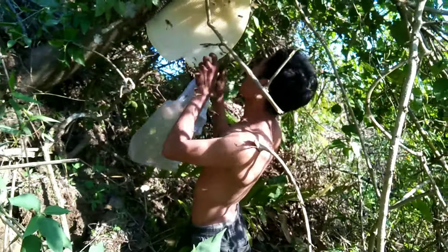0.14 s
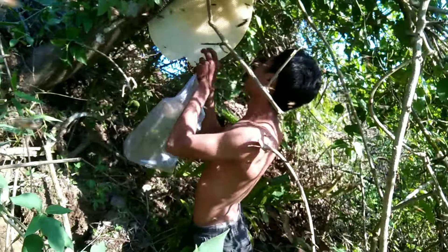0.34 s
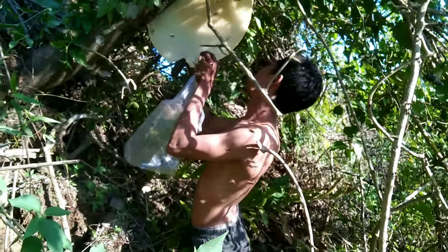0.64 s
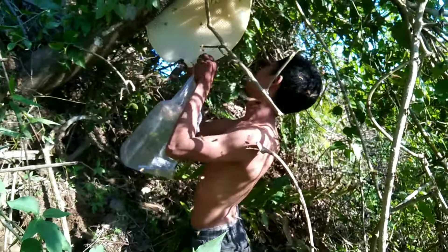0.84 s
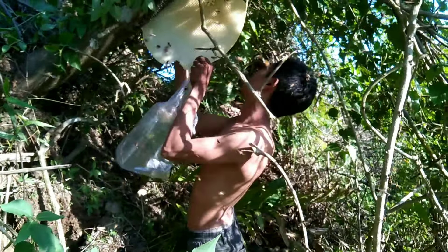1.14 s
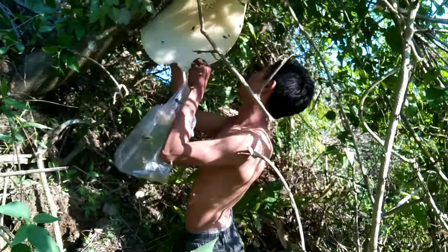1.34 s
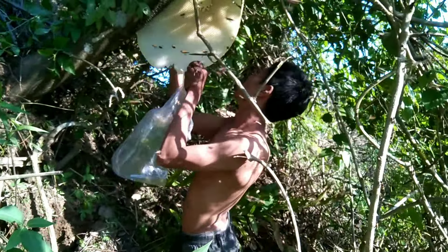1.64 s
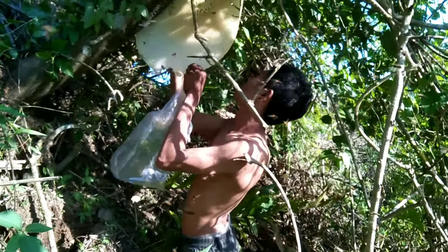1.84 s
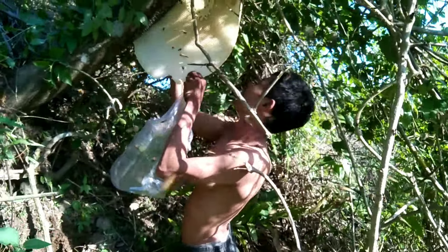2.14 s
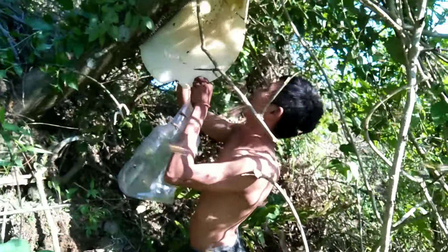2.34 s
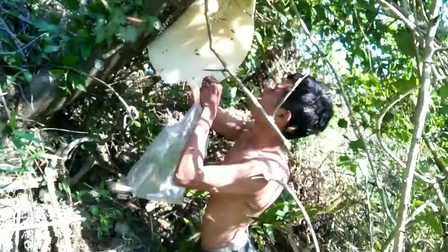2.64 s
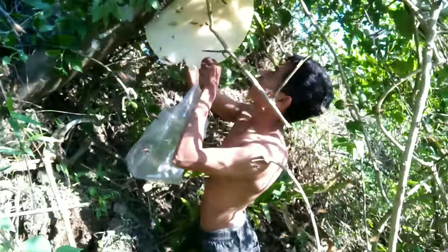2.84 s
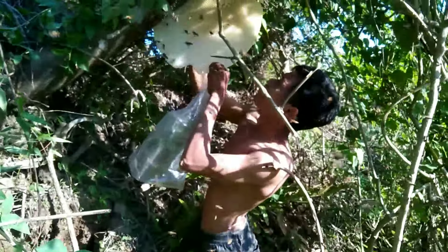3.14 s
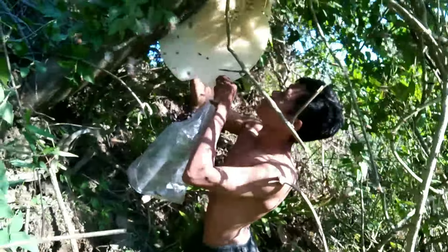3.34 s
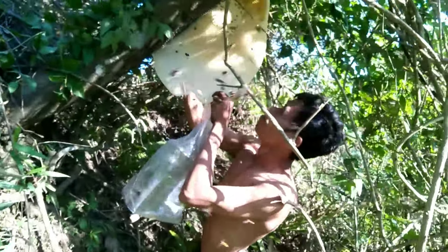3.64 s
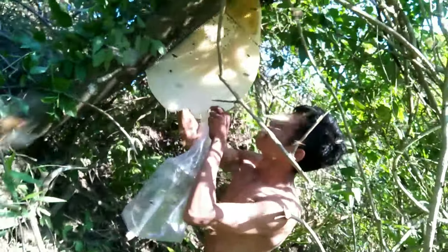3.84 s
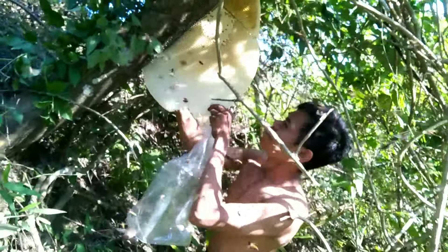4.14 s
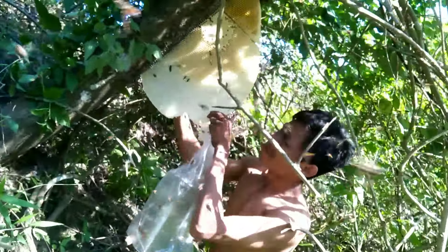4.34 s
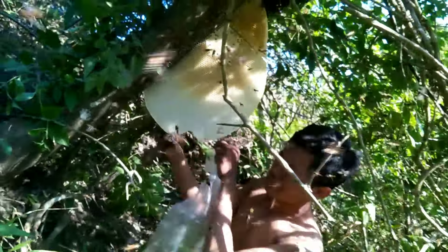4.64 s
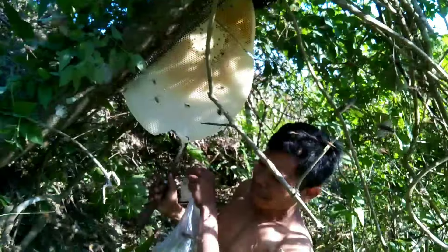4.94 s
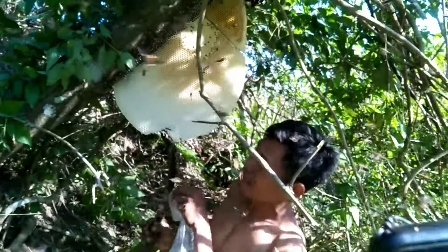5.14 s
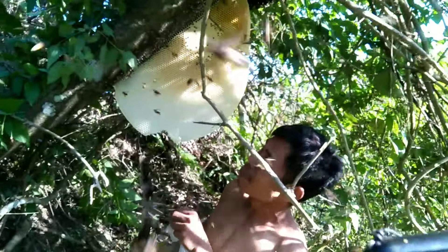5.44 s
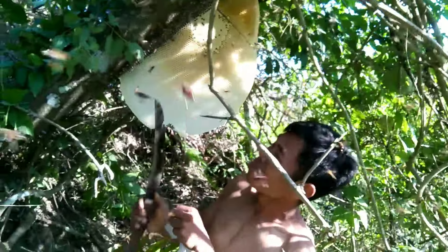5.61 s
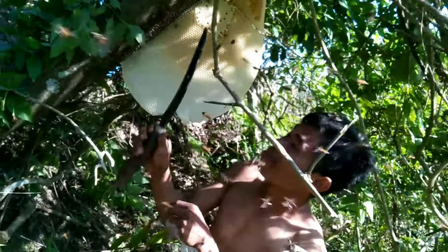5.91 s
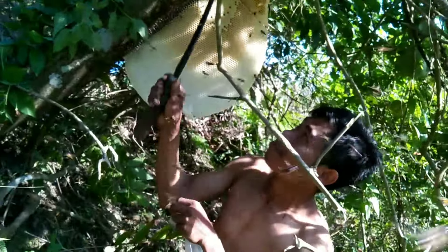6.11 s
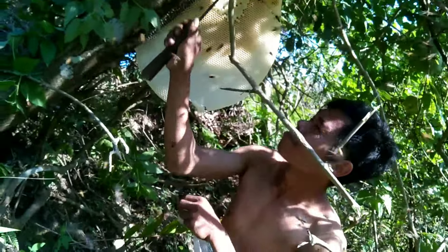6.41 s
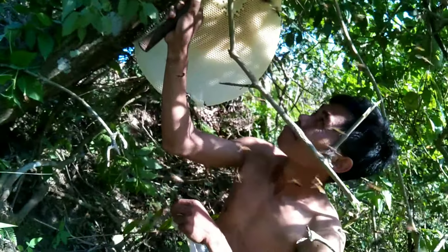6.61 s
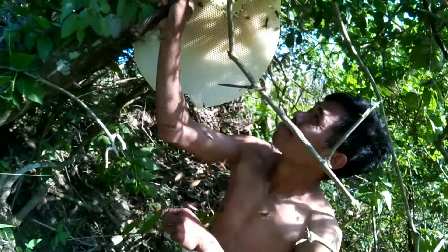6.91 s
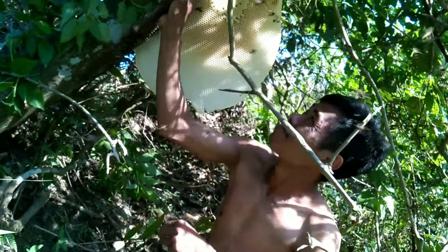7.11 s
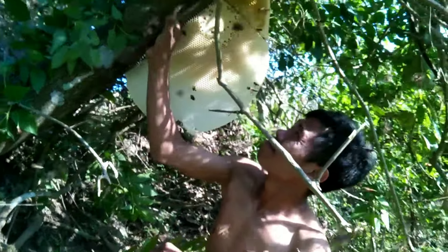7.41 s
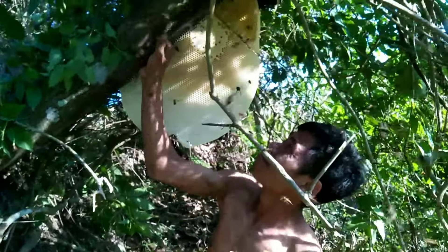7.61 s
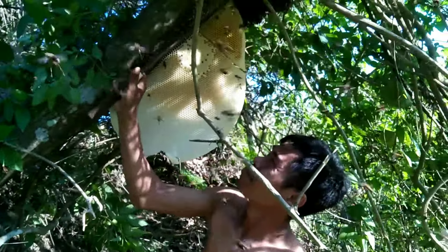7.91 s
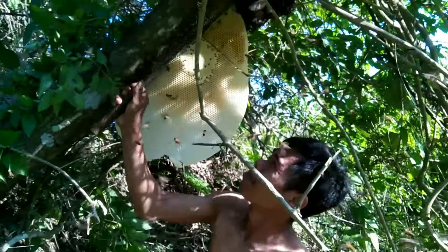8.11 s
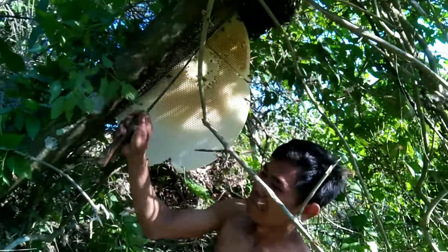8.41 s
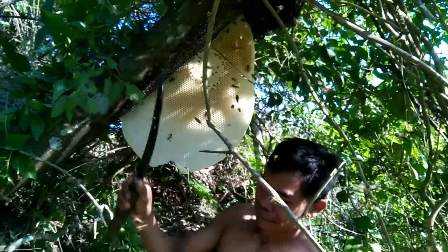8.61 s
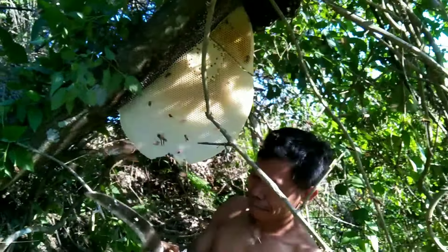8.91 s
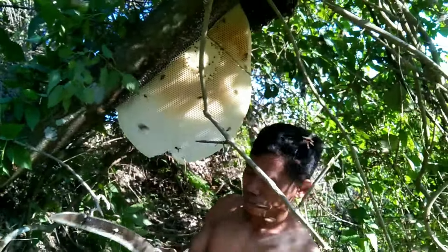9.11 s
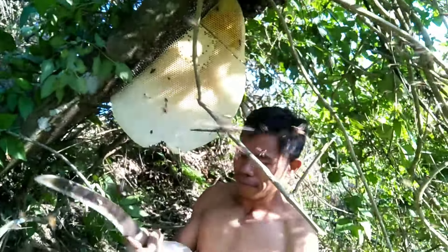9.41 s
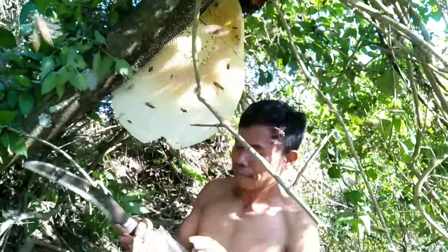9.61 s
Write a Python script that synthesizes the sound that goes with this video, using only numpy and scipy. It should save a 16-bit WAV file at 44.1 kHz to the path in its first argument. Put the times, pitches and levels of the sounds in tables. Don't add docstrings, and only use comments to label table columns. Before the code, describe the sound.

A bee swarm hums in a leafy thicket, a plastic bag crackles sharply close by, and near the end one bee buzzes hard past the microphone.

```python
import sys
import numpy as np
from scipy import signal
from scipy.fft import rfft, irfft
from scipy.io import wavfile
from scipy.ndimage import uniform_filter1d

SR = 44100
rng = np.random.default_rng(int(sys.argv[2]) if len(sys.argv) > 2 else 0)


def materialize(psi):
    bounded = np.clip(np.atleast_2d(psi).T, -1, 1)
    quanta = np.round(bounded * 32767).astype(np.int16)
    wavfile.write(sys.argv[1], SR, quanta)


def boost_factor(decibels):
    exponent = np.asarray(decibels, float) / 20
    return 10 ** exponent


N = 430416

# (wing beat [Hz], spread [share], bees [count], level [dB])
FLIGHTS = [
    (120.8, .10, 6, -1.5),
    (149.3, .08, 6, -0.5),
    (202.55, .045, 14, -5),
    (280.8, .06, 7, -7),
]
# (frequency [Hz], gain [dB])
WING_COLOUR = [(60, -11), (110, -7.5), (200, 4), (290, 2.5), (335, -2), (385, 0.5), (440, -3.5),
               (490, -12.5), (560, -11.5), (900, -15.5), (1100, -20), (1400, -19), (1900, -41), (2600, -49)]
# (time [s], level [dB])
THICKNESS = [(0, -60), (.45, -55.5), (.85, -57.5), (1.3, -51.5), (1.9, -55), (2.5, -50), (3.0, -50),
             (3.5, -46.5), (4.4, -44.5), (5.2, -45.5), (5.8, -44), (6.3, -43.5), (7.0, -45.5), (7.6, -47.5),
             (8.5, -47), (9.0, -48.5), (9.4, -46), (9.76, -47.5)]
# (level at mean thickness [dB], share of swing [1], wander [dB])
WING_RANGES = [
    (-53.5, 1.1, -1),
    (-44, 0.26, -1.5),
    (-47, 1.21, 1.5),
    (-53, 1.53, 1),
]
# (time [s], length [s], level [dB])
HEAVY_FLYBYS = [(0.016, 0.036, -39), (0.152, 0.044, -48), (0.296, 0.048, -54), (1.08, 0.12, -44),
                (1.8, 0.047, -45), (2.065, 0.15, -42), (2.553, .12, -48), (2.894, 0.045, -47),
                (3.11, 0.11, -45.5), (3.535, 0.14, -43), (4.082, 0.12, -45.5), (4.41, 0.08, -44),
                (4.781, 0.26, -42.5), (5.68, 0.1, -39.5), (6.157, 0.29, -40.5), (6.757, 0.077, -47),
                (7.4, 0.095, -47), (7.704, 0.089, -44.5), (7.86, .04, -52), (8.07, 0.064, -41),
                (8.332, 0.11, -48), (8.86, 0.18, -49), (9.43, .06, -49), (9.68, 0.025, -66)]
# (time [s], length [s], level [dB])
WORKER_FLYBYS = [(0, 0.035, -38.5), (0.124, 0.096, -41), (0.28, 0.079, -42), (0.568, 0.034, -44),
                 (1.06, 0.063, -40), (1.28, 0.12, -39), (1.426, 0.031, -39), (1.636, 0.087, -40),
                 (1.938, 0.32, -43), (2.46, 0.096, -39), (2.813, 0.045, -41), (3.063, 0.11, -44),
                 (3.327, 0.12, -37.5), (3.754, 0.2, -40), (4.086, 0.11, -45), (4.457, 0.68, -41),
                 (5.645, 0.43, -38.5), (6.022, 0.42, -38.5), (6.715, 0.26, -42), (7.08, 0.15, -38.5),
                 (7.467, 0.066, -37), (7.676, 0.044, -37.5), (7.876, 0.071, -40.5), (8.14, 0.05, -33),
                 (8.435, 0.054, -36.5), (8.894, 0.4, -39.5), (9.228, 0.037, -35.5), (9.54, 0.13, -61)]
# (time [s], length [s], level [dB])
BANKING_FLYBYS = [
    [(.15, 0.11, -47), (.4, 0.031, -47), (.56, .08, -51), (.72, .06, -52), (.97, 0.042, -47.5),
     (1.2, 0.32, -48.5), (1.4, 0.091, -46), (2.07, 0.055, -51), (2.3, 0.077, -43.5), (2.68, 0.028, -41.5),
     (2.95, 0.1, -50), (5.7, .3, -45), (7.73, 0.052, -41), (7.9, 0.16, -43)],
    [(.02, 0.072, -50.5), (.27, 0.1, -52), (.5, .07, -59.5), (.68, 0.091, -62), (.95, 0.047, -59.5),
     (1.15, 0.039, -50.5), (1.46, 0.041, -55), (1.77, 0.064, -54), (2.35, 0.2, -51.5), (2.85, 0.11, -53.5),
     (6.1, 0.064, -57), (7.3, 0.094, -53), (8.35, 0.12, -53), (8.96, .08, -47.5)],
]
# (time [s], length [s], level [dB])
AIR_PUSHES = [(1.05, .08, -60), (2.07, .08, -64), (3.68, .08, -57), (4.5, .08, -55), (4.97, .08, -55),
              (5.25, .06, -58), (5.62, .15, -58), (6.15, 0.17, -61), (8.1, .05, -59)]
# (time [s], level [dB])
BREEZE = [(0, -59), (.65, -63.5), (1.0, -60.5), (2.0, -61.5), (2.58, -60), (3.3, -61), (3.6, -56),
          (4.05, -51), (4.9, -51), (5.46, -50), (6.03, -47.5), (6.5, -53), (6.85, -51.5), (7.03, -57),
          (7.4, -53.5), (8.1, -55.5), (8.8, -56.5), (9.76, -50)]
# (start [s], hold [s], level [dB], low part against it [dB])
BAG_RUBS = [(3.65, 0.16, -50, -4), (3.716, 0.23, -41.5, -15), (4.157, 0.19, -38.5, -15),
            (4.39, 0.051, -32, -10.5), (4.468, 0.14, -40, -12), (4.64, 0.071, -41, -10),
            (4.76, 0.05, -51.5, -8), (7.867, 0.047, -45, -9.5), (8.957, 0.065, -47.5, -8),
            (9.037, 0.17, -41.5, -14), (9.08, 0.082, -34.5, -6.5), (9.239, 0.13, -35, -8),
            (9.413, 0.2, -36, -6), (9.625, 0.15, -47, -8)]
# (frequency [Hz], gain [dB])
CRACKLE_COLOUR = [(1500, -0.5), (2000, -3), (3800, -1.5), (5000, 0), (7500, 7.5), (10000, 1), (11000, 0.5),
                  (15500, -5.5)]
# (centre [Hz], width [Hz], level against the breeze [dB])
INSECTS = [
    (2430, 1140, -11.5),
    (5230, 650, -10),
]
# (time [s], length [s], centre
# [Hz], width [Hz], level [dB])
BRUSHES = [(.275, .04, 5200, 900, -48), (.31, .05, 11200, 1500, -53), (.93, .06, 11000, 2500, -55),
           (1.52, .05, 10700, 900, -60), (1.985, .03, 5500, 600, -47), (1.985, .03, 7900, 300, -51),
           (2.03, .04, 10600, 1500, -55), (2.515, .04, 7200, 1000, -46), (2.53, .05, 13000, 2500, -57),
           (2.28, .04, 13200, 900, -59), (3.1, .06, 2700, 800, -58), (2.06, .03, 2600, 1200, -60),
           (8.96, .03, 5000, 700, -50), (4.125, .03, 6200, 4000, -46), (6.8, .08, 4800, 1600, -51),
           (7.33, .06, 5000, 1200, -51), (7.72, .08, 4500, 900, -54), (8.4, .06, 7300, 1200, -53),
           (9.176, .008, 6500, 6000, -25), (9.352, .018, 6000, 6500, -27), (9.503, .012, 6000, 6000, -32),
           (9.532, .008, 6500, 6000, -29), (9.552, .007, 6500, 6500, -22), (9.623, .008, 7500, 5000, -29),
           (3.84, 0.14, 8200, 1800, -39.5), (4.04, 0.096, 2700, 450, -49.5), (3.9, .05, 7700, 2600, -54),
           (4.06, .07, 12500, 6700, -62), (4.22, .07, 8100, 1700, -41.5), (9.24, 0.13, 4700, 1100, -41),
           (4, 0.06, 5200, 2000, -55), (3.17, 0.18, 7700, 300, -65), (3.56, .05, 5100, 300, -58),
           (5.66, 0.094, 7100, 900, -44.5), (5.45, 0.025, 8700, 1200, -45), (6.24, 0.09, 7240, 780, -54),
           (8.36, 0.14, 4900, 460, -57), (8.53, 0.084, 4900, 560, -55), (8.53, 0.052, 6850, 290, -50),
           (8.65, 0.067, 5050, 250, -56), (8.68, 0.15, 7450, 190, -53.5), (8.8, 0.18, 8750, 250, -52),
           (7.9, 0.068, 7050, 330, -46), (8.88, 0.062, 5000, 230, -57), (8.98, 0.068, 4800, 420, -52),
           (8.37, 0.096, 2850, 490, -56), (8.97, 0.036, 4100, 400, -55), (7.72, 0.11, 4550, 300, -61),
           (7.43, 0.07, 2650, 400, -58)]
# (time [s], peak [dB], centre [Hz], width [octaves])
LEAF_TICKS = [(0.001, -36, 8950, .6), (0.2892, -32.5, 10000, 0.48), (0.432, -40, 7350, .99),
              (0.885, -38, 11300, 0.97), (1.118, -43, 11300, 0.22), (2.0543, -32.5, 8000, 0.97),
              (3.6062, -31, 7040, 0.95), (4.845, -31, 5200, .99), (5.043, -27.5, 7450, 0.58),
              (5.0726, -26, 7240, 0.72), (5.374, -37, 7650, 0.53), (5.83, -24, 8900, 0.89),
              (5.903, -23.5, 8700, .99), (6.917, -42.5, 4630, 0.45), (7.092, -55, 6440, 0.73),
              (7.278, -28, 11500, .99), (7.488, -32.5, 11900, 0.47), (7.661, -36, 7100, 0.63),
              (7.867, -35, 6000, .99), (7.978, -35, 7300, 0.48), (8.306, -39, 4800, 0.3),
              (8.34, -35.5, 7300, .25), (8.947, -39, 8400, 0.37)]
# (time [s], peak [dB], centre [Hz], width [octaves])
SNAPS = [(.29, -26, 9000, 1.6), (.886, -40, 11000, 0.92), (7.092, -46, 2000, 2.7),
         (3.711, -7.5, 7800, 2.24), (3.7215, -15.5, 7500, 0.98), (3.756, -22, 9000, 1),
         (3.7736, -12, 7340, 1.6), (3.817, -20.5, 7050, 0.99), (3.847, -22, 8000, 1),
         (3.88, -26, 8000, .8), (3.8932, -16, 9500, 1.25), (3.901, -22, 9000, 0.74),
         (3.9577, -17, 8500, 1.5), (4.0999, -30.5, 6200, 0.65), (4.1553, -23, 8000, 0.69),
         (4.177, -25, 8500, 0.92), (4.215, -23, 7500, 1.2), (4.2625, -24, 5250, 1),
         (4.318, -21, 7170, 1.1), (4.3936, -9, 7000, 1.3), (4.408, -26, 3300, 0.39),
         (4.4645, -14, 7200, 0.58), (4.499, -17, 7860, 1.4), (4.5334, -20.5, 6000, 1.05),
         (4.582, -32, 8000, .6), (4.5904, 2, 8400, 1.34), (4.698, -18, 10100, 0.95),
         (4.726, -28, 9000, 0.81), (9.1623, -18, 5000, 1.1), (9.2755, -19, 7700, 1.3),
         (9.293, -34, 8500, 0.82), (9.3324, -24, 8300, .9), (9.4112, -23, 7470, 1.3),
         (9.4347, -22, 7390, 1.4), (9.467, -18, 6500, 1.4), (9.486, -18, 5860, 1.5),
         (9.5245, -18, 7500, 0.76), (9.548, -15, 7100, 1.2), (9.6203, -31, 7500, 1.2),
         (9.7001, -29, 7100, 0.33), (9.7405, -20, 5230, 1.37), (4.3948, -13, 3600, 1.2),
         (4.3962, -17, 7000, 1.2), (4.146, -26, 7400, 0.62), (4.431, -23, 6000, 1.2),
         (9.173, -30, 6300, 1.2), (9.388, -22, 2500, 1.1), (4.469, -20, 7500, .7),
         (3.983, -30, 2800, 1.2), (4.412, -20, 5000, 1.2)]
# (time [s], wing beat [Hz])
PASSING_BEAT = [
    (8.9726, 200.2),
    (9.04, 204.5),
    (9.072, 210.7),
    (9.092, 219.6),
    (9.108, 224.3),
    (9.126, 220.4),
    (9.165, 222.5),
    (9.24, 217),
]
# (loudest [s], level [dB], approach [dB/s], leave [dB/s])
HARMONIC_LOBES = [
    [(9.112, -8, 310, 450), (9.04, -37, 100, 300), (9.2, -34, 200, 120)],
    [(9.121, -19, 1400, 300), (9.09, -25, 420, 300), (9.135, -16, 500, 800), (9.015, -35, 600, 900)],
    [(9.114, -25, 240, 450), (9.15, -38, 600, 900)],
    [(9.115, -23, 400, 330), (9.06, -46, 200, 300), (9.155, -39, 400, 700)],
]
# (first [harmonic], last [harmonic], loudest [s], level [dB], fade [dB/s])
HARMONIC_FLASHES = [(5, 5, 9.09, -41, 300), (5, 5, 9.132, -35, 500), (6, 8, 9.1, -42, 260),
                    (6, 8, 9.135, -45, 300), (9, 10, 9.088, -47, 350), (9, 10, 9.122, -41, 600),
                    (11, 13, 9.1, -52, 250), (14, 18, 9.086, -42, 330), (11, 19, 9.135, -50, 300)]
# (start [s], hold [s], centre [Hz], width [Hz], level [dB])
TIP_HISS = [
    (8.97, .13, 5050, 900, -43),
    (9.05, .09, 7500, 4000, -44),
    (9.12, .02, 330, 420, -29),
    (9.07, .03, 3400, 900, -48),
]
# (time [s], width [s], frequency [Hz], level [dB])
DOWNWASH = (9.141, .009, 113, -9)


def rms_one(x):
    return x / np.sqrt(np.mean(x ** 2) + 1e-20)


def in_time(rows):
    return np.interp(np.arange(N) / SR, *np.transpose(rows))


def coloured(x, points):
    hz, gain_db = np.transpose(points)
    grid_hz = np.fft.rfftfreq(len(x), 1 / SR) + 1
    return irfft(rfft(x) * boost_factor(np.interp(np.log(grid_hz), np.log(hz), gain_db)), len(x))


def band(x, low_hz, high_hz, order=3):
    return signal.sosfilt(signal.butter(order, [low_hz, high_hz], "band", fs=SR, output="sos"), x)


def around(x, centre_hz, width_hz):
    return band(x, centre_hz - width_hz / 2, centre_hz + width_hz / 2, order=2)


def evened(x, window_s):
    return x / np.sqrt(uniform_filter1d(x ** 2, size=int(window_s * SR)) + 0.04 * np.mean(x ** 2))


def peaked(t, peak_s, hold_s, level_db, rise_db_per_s, fall_db_per_s):
    climb_db = rise_db_per_s * np.maximum(peak_s - t, 0)
    return boost_factor(level_db - climb_db - fall_db_per_s * np.maximum(t - peak_s - hold_s, 0))


def drift(rate, size):
    r = np.exp(-200 * np.pi * rate / SR)
    slow = signal.lfilter([1], [1, -2 * r, r * r], rng.standard_normal(N // 100 + 1500))[1499:]
    return np.interp(np.linspace(0, len(slow) - 1, size), np.arange(len(slow)), rms_one(slow))


def smooth_chance(shape, frames, bins):
    field = rng.standard_normal(shape)
    for _ in range(2):
        field = uniform_filter1d(field, frames, axis=1)
        field = uniform_filter1d(field, bins, axis=0)
    return rms_one(field)


def patchy(x, lift, frames, bins, gate, broad_db):
    _, _, z = signal.stft(x, nperseg=1024, noverlap=768)
    frame_at = np.linspace(0, N, z.shape[1])
    gate = np.interp(frame_at, np.arange(N), gate + np.zeros(N))
    broad_db = np.interp(frame_at, np.arange(N), broad_db + np.zeros(N))
    favoured = 0.3 * smooth_chance((len(z), 1), 1, bins)
    opening = np.maximum(smooth_chance(z.shape, frames, bins) + favoured - gate, 0)
    flecks = 1 + lift * np.tanh(opening)
    broad = np.minimum(smooth_chance(z.shape, 2 * frames, 4 * bins), 1)
    gain = flecks * boost_factor(broad_db * broad)
    gain /= np.sqrt(uniform_filter1d(np.mean(gain ** 2, axis=0), size=40))
    return signal.istft(z * gain, nperseg=1024, noverlap=768)[1][:N]


def flybys(rows):
    t = np.arange(0, N + 64, 64) / SR
    power = sum(boost_factor(2 * db) * np.exp(-2 * ((t - s) / length_s) ** 2) for s, length_s, db in rows)
    return np.interp(np.arange(N) / SR, t, power)


def range_gains():
    swing_db = in_time(THICKNESS) + 48
    wander_share = np.clip(0.5 - 0.16 * swing_db, 0.3, 2)
    gains = []
    for (db, share, wander_db), rows in zip(WING_RANGES, [HEAVY_FLYBYS, WORKER_FLYBYS] + BANKING_FLYBYS):
        level_db = db + share * swing_db + wander_db * wander_share * drift(3.2, N)
        gains.append(np.sqrt(boost_factor(2 * level_db) + flybys(rows)))
    return gains


def one_bee(beat_hz, spread, size, swell_db):
    effort = spread * drift(0.5, size) + 0.035 * drift(4, size) + 0.012 * drift(25, size)
    turns = np.cumsum(beat_hz * (1 + effort)) * 8 / SR
    cycle, k = np.linspace(0, 1, 257), np.arange(1, 13)
    weights = boost_factor(rng.normal(0, 1.36, 12)) * (k * beat_hz < SR / 18)
    harmonics = np.sin(2 * np.pi * (k * cycle[:, None] + rng.random(12)))
    stroke = np.sum(weights * harmonics, axis=1)
    return boost_factor(swell_db * drift(7.0, size)) * np.interp(turns % 1, cycle, stroke)


def swarm(gains):
    size = N // 8 + 1
    wings = np.zeros(size)
    for beat_hz, spread, count, db in FLIGHTS:
        for _ in range(int(count)):
            wings += boost_factor(db) * np.sqrt(beat_hz / 200) * one_bee(beat_hz, spread, size, swell_db=4.0)
    far = 0.05 * rng.standard_normal(size)
    wings = coloured(signal.resample_poly(rms_one(wings) + far, 8, 1)[:N], WING_COLOUR)
    broad_db = np.clip(-0.5 * (in_time(THICKNESS) + 43), 1.5, 7)
    wings = patchy(wings, 2.0, frames=8, bins=3, gate=-0.1, broad_db=broad_db)
    deep, low, mid = [signal.sosfiltfilt(signal.butter(4, split_hz, fs=SR, output="sos"), wings)
                      for split_hz in (145, 490, 950)]
    parts = [deep, low - deep, mid - low, wings - mid]
    return sum(gain * evened(part, 0.075) for part, gain in zip(parts, gains))


def rumble(deep_gain):
    steady = boost_factor(-41 + 0.78 * drift(2, N)) * deep_gain ** 0.63
    return (steady + np.sqrt(flybys(AIR_PUSHES))) * rms_one(band(rng.standard_normal(N), 60, 110))


def stirring():
    t = np.arange(0, N + 64, 64) / SR
    leaf = boost_factor(2 * np.interp(t, *np.transpose(BREEZE)))
    rubs = np.array([peaked(t, s, hold_s, db, 498, 143) ** 2 for s, hold_s, db, _ in BAG_RUBS])
    body_db = np.array(BAG_RUBS)[:, 3]
    bag = rubs.sum(axis=0)
    body = boost_factor(2 * body_db) @ rubs
    edge = boost_factor(-2 * 0.51 * (body_db + 1.0)) @ rubs
    leaf_low = leaf * boost_factor(2 * -2) * (leaf * boost_factor(91.5)) ** 0.41
    powers = [leaf + bag, leaf_low + body, leaf * boost_factor(2 * 1.5) + boost_factor(2 * -16) * edge]
    return [np.interp(np.arange(N) / SR, t, 10 * np.log10(power)) for power in powers]


def rustle(level_db, low_db, top_db, effort):
    grain_rate_hz = 1400 * boost_factor(4.5 * drift(40, N))
    heights = boost_factor(4.0 * np.minimum(rng.exponential(1, N), 4))
    grains = heights * (rng.random(N) < grain_rate_hz / SR)
    tails = rms_one(signal.lfilter([1], [1, -0.93], grains))
    source = rng.standard_normal(N) * (1 + 0.55 * effort * tails)
    crackle = coloured(evened(source, 0.042), CRACKLE_COLOUR)
    parts = [(1380, 3110, low_db), (3800, 11650, level_db), (10280, 18600, top_db)]
    return sum(boost_factor(db) * rms_one(band(crackle, low_hz, high_hz)) for low_hz, high_hz, db in parts)


def insects():
    out = np.zeros(N)
    for hz, width_hz, db in INSECTS:
        hiss = rms_one(around(rng.standard_normal(N), hz, width_hz))
        out += boost_factor(db + 1.6 * drift(4.1, N)) * hiss
    return boost_factor(in_time(BREEZE)) * out


def snaps(rows, t60_s, crack):
    out, t = np.zeros(N), np.arange(SR // 6) / SR
    decay = boost_factor(-60 * t / 0.025) + 0.64 * boost_factor(-60 * t / t60_s)
    for s, peak_db, hz, octaves in rows:
        burst = rng.standard_normal(len(t)) * decay
        burst[0] += crack * np.clip(2 * (octaves - 1), 0, 1)
        edge = 2 ** np.clip(octaves / 2, 0.1, 2)
        burst = band(burst, hz / edge ** 1.19, min(hz * edge, 15500), order=2)
        at = round(s * SR)
        out[at:at + len(t)] += (boost_factor(peak_db) * burst / np.abs(burst).max())[:N - at]
    return out


def brushes():
    out, t = np.zeros(N), np.arange(-SR // 4, SR // 4) / SR
    for s, length_s, hz, width_hz, db in BRUSHES:
        grain = boost_factor(4.0 * np.minimum(rng.exponential(1, len(t)), 3.5))
        hiss = rms_one(around(rng.standard_normal(len(t)) * grain, hz, width_hz))
        at = round(s * SR) - SR // 4
        out[at:at + len(t)] += (boost_factor(db) * np.exp(-2 * (t / length_s) ** 2) * hiss)[:N - at]
    return out


def wing_hiss():
    t = np.arange(N) / SR
    phase = 2 * np.pi * np.cumsum(in_time(PASSING_BEAT)) / SR
    stroke = (0.5 + 0.5 * np.cos(phase)) ** 2
    out = np.zeros(N)
    for s, hold_s, hz, width_hz, db in TIP_HISS:
        hiss = evened(around(stroke * rng.standard_normal(N), hz, width_hz), 0.009)
        out += peaked(t, s, hold_s, db, 500, 500) * hiss
    return out


def downwash(t):
    s, width_s, hz, db = DOWNWASH
    thump = boost_factor(db) * np.sin(2 * np.pi * hz * (t - s) + 4.0)
    gust = boost_factor(-30) * np.cos(2 * np.pi * 55 * (t - s))
    return np.exp(-0.5 * ((t - s) / width_s) ** 2) * (thump + gust)


def passing_bee():
    start, end = round(PASSING_BEAT[0][0] * SR), round(PASSING_BEAT[-1][0] * SR)
    t, out = np.arange(start, end) / SR, np.zeros(N)
    near = np.clip((t - t[0]) / 0.051, 0, 1) * np.clip((t[-1] - t) / 0.038, 0, 1)
    phase = 2 * np.pi * np.cumsum(np.interp(t, *np.transpose(PASSING_BEAT))) / SR
    turn_rad = -1.61 * np.clip((t - 9.107) / 0.016, 0, 1)
    gains = [sum(peaked(t, s, 0, db, rise, fall) for s, db, rise, fall in lobes)
             for lobes in HARMONIC_LOBES]
    for k in range(5, 19):
        flash = sum(peaked(t, s, 0, db, fade, fade)
                    for first, last, s, db, fade in HARMONIC_FLASHES if first <= k <= last)
        flutter = boost_factor(1.5 * drift(9.8, N // 8)[::3][:end - start])
        gains.append(flash * flutter)
    wings = np.zeros(len(t))
    for k, gain in enumerate(gains, 1):
        slip_rad = turn_rad * (k - 1) * (k < 5)
        wings += gain * np.cos(k * phase + slip_rad)
    out[start:end] = -np.sqrt(2) * near * wings + downwash(t)
    return out


def scene():
    gains = range_gains()
    bees = swarm(gains) + rumble(gains[0]) + passing_bee() + wing_hiss()
    level_db, low_db, top_db = stirring()
    effort = np.clip((level_db + 47) / 10, 0, 1)
    leaves = rustle(level_db, low_db, top_db, effort) + insects() + brushes()
    leaves += snaps(LEAF_TICKS, t60_s=0.3, crack=0.0)
    gate = np.clip(-0.1 * (level_db + 50), 0.3, 1.3)
    broad_db = np.clip(0.3 * (level_db + 65), 1.3, 2.2)
    broken = patchy(leaves, 6.0, frames=5, bins=2, gate=gate, broad_db=broad_db)
    whole = 0.9 * effort
    leaves = np.sqrt(1 - whole) * broken + np.sqrt(whole) * leaves
    bag = snaps(SNAPS, t60_s=0.1, crack=16.0)
    return (bees + leaves + bag)[None]


def band_limit(x):
    return signal.sosfilt(signal.butter(12, 16650, fs=SR, output="sos"), x)


def record(dry):
    top_cut = signal.ellip(12, 0.5, 65, 15650, fs=SR, output="sos")
    port_cut = signal.butter(2, 26, "high", fs=SR, output="sos")
    mix = signal.sosfilt(top_cut, np.clip(dry, -1, 1))
    mix = signal.sosfilt(port_cut, mix)
    return band_limit(np.clip(mix, -1, 1))


dry = scene()
out = record(dry)
materialize(out)
```